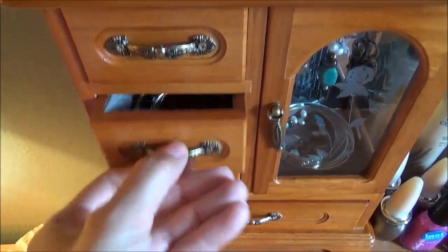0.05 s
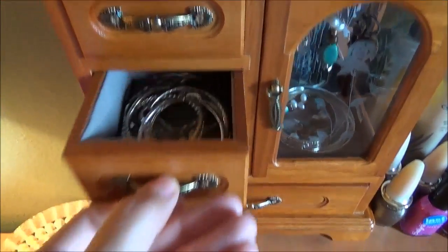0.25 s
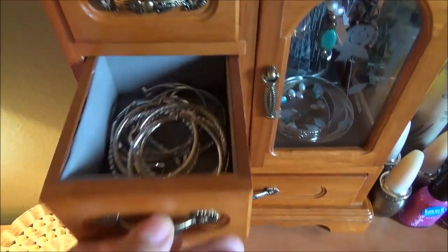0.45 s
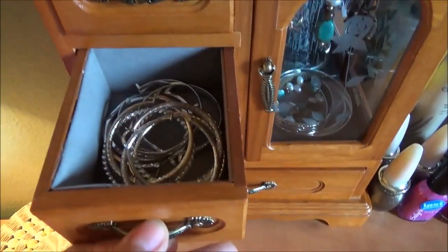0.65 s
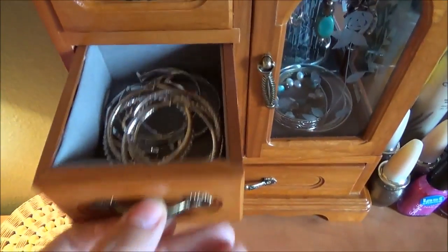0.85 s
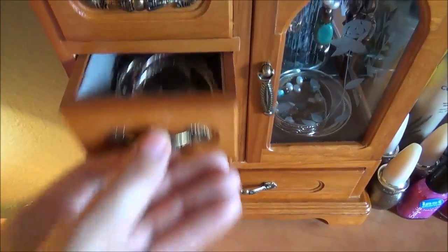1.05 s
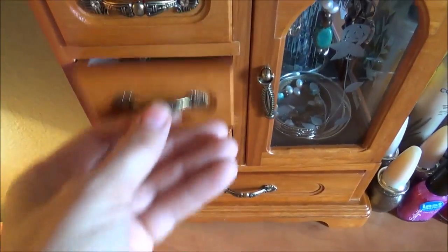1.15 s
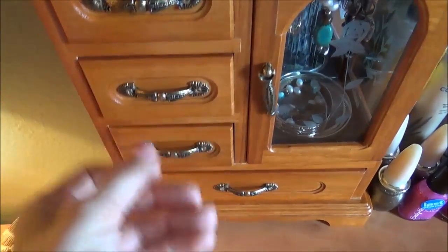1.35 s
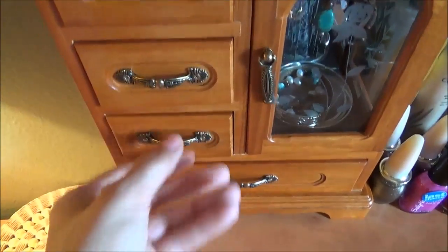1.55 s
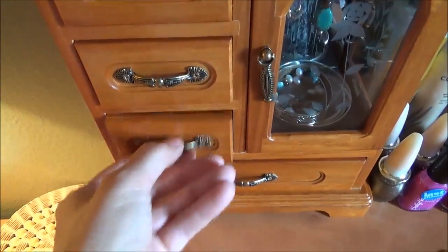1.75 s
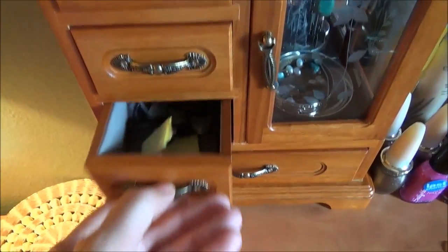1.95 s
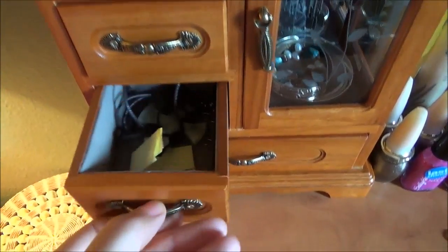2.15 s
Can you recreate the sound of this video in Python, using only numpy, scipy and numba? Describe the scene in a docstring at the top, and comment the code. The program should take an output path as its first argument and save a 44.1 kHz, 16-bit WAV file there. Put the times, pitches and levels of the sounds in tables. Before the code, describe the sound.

Close up in a quiet room, wood rubs on wood as a little cabinet drawer is pulled out, then shoved in harder with a burst of knocks; small metal ticks follow and the drawer below is drawn out jerkily.

```python
"""A quiet furnished room, two-port microphone close to a jewellery cabinet with small wooden drawers.
A hand pulls one drawer out, pushes it shut with a clatter, lifts the handle of the next and pulls that.
Wood sticks and slips on wood: dense tiny jolts ring the cabinet panels, the drawer and its air pocket.
Grain hisses under the slide, knocks crack, metal ticks; a room tail, air noise and faint hum lie behind."""
import sys
import numpy as np
from scipy import signal
from scipy.fft import rfft, irfft
from scipy.io import wavfile
from scipy.ndimage import uniform_filter1d
from numba import njit

SR = 44100
rng = np.random.default_rng(int(sys.argv[2]) if len(sys.argv) > 2 else 0)


def gain_from_decibels(decibels):
    """Convert decibel values to linear amplitude factors."""
    exponent = np.asarray(decibels, float) / 20
    return 10 ** exponent


def master_out(mix):
    """Clip the mix to full scale and print it as 16-bit PCM to the path in sys.argv[1]."""
    frames = np.transpose(np.atleast_2d(mix))
    ceiling = np.clip(frames, -1, 1)
    pcm = np.round(ceiling * 32767).astype(np.int16)
    wavfile.write(sys.argv[1], SR, pcm)


N = 96579
T = np.arange(N) / SR

# the three slides, each with its own rows: time_s, rub_on_frame_db, rub_on_drawer_db, hiss_db, pocket_hz
SLIDES = [
    [(0.0, -34.5, -32.5, -36.5, 770), (0.038, -29, -26.5, -40, 780), (0.086, -32.5, -22.5, -36, 797),
     (0.15, -28.5, -25, -41.5, 860), (0.158, -29.5, -24.5, -42, 917), (0.204, -30.5, -24, -31.5, 914),
     (0.232, -31, -29, -39, 980), (0.262, -31.5, -26.5, -37, 960), (0.326, -32, -30.5, -45.5, 840),
     (0.408, -36, -31, -47.5, 924), (0.452, -40.5, -38, -48, 920), (0.47, -35, -35, -52, 940),
     (0.492, -50, -54, -56, 950), (0.522, -65, -92, -83, 929), (0.54, -41, -71, -86, 930),
     (0.574, -80, -89, -82, 960)],
    [(0.666, -69, -89, -91, 880), (0.692, -48.5, -49, -90, 915), (0.758, -59, -50.5, -84, 895),
     (0.77, -42, -48, -68, 855), (0.796, -46, -47, -47.5, 850), (0.824, -36.5, -34.5, -47.5, 894),
     (0.886, -33.5, -31.5, -43.5, 960), (0.902, -29, -30.5, -47, 910), (0.914, -24, -34.5, -40, 895),
     (0.948, -42, -20, -38.5, 1020), (0.96, -23.5, -19, -30, 1060), (0.972, -24.5, -17.5, -28.5, 1010),
     (1.002, -19.5, -22.5, -29.5, 930), (1.03, -21.5, -20.5, -28, 1030), (1.055, -22, -25, -33, 860),
     (1.075, -28.5, -17, -35.5, 880), (1.12, -25.5, -22.5, -34.5, 880), (1.148, -39, -51, -33, 800),
     (1.16, -33, -36, -35.5, 770)],
    [(1.735, -34, -56, -55, 685), (1.745, -46, -57, -44.5, 667), (1.765, -34.5, -51, -46.5, 700),
     (1.789, -29.5, -27.5, -38.5, 687), (1.823, -30.5, -47, -38.5, 710), (1.865, -34, -50, -40.5, 760),
     (1.877, -25.5, -35.5, -36, 760), (1.913, -28.5, -28, -36, 750), (1.945, -31, -24.5, -41.5, 700),
     (1.961, -32, -25.5, -44.5, 700), (1.981, -28.5, -22, -43.5, 716), (2.027, -32, -31, -45, 740),
     (2.049, -23, -21.5, -40, 720), (2.063, -40, -27, -51, 730), (2.121, -39, -48, -53, 730),
     (2.163, -40.5, -46.5, -61, 830), (2.19, -33, -33, -73, 780)],
]
POCKET_WIDTH_HZ, POCKET_DB = (270, 297, 284), (9, 9, 6)  # one value per slide
# the whole cabinet rocking on a knock: pitch_hz, level_db, t60_s
CABINET_ROCK = [(65, -44, 0.17)]
# cabinet panels, rung by rubbing on the frame, catches and knocks: pitch_hz, level_db, t60_s
CABINET_PANELS = [(139, -24, 0.11), (183.6, -16.5, 0.068), (247, -8.5, 0.081), (318.5, -3, 0.064),
                  (414.8, -2.5, 0.083), (481, -6.5, 0.075), (566.3, -6, 0.061), (709.7, -8.5, 0.11),
                  (800, -3.5, 0.017), (1081, -6, 0.046), (1385, -3, 0.015), (2134, -14.5, 0.027),
                  (3300, -40, 0.012)]
# wood of the first drawer: pitch_hz, level_db, t60_s
UPPER_DRAWER = [(825, -1, 0.084), (871, 4.5, 0.033), (1005, -2.5, 0.02), (1091, -11.5, 0.058),
                (1320, -19, 0.023), (1337, -11, 0.02), (1642, -8.5, 0.053), (1778, -11.5, 0.046),
                (1924, -5, 0.022), (2435, -13, 0.063), (2685, -3, 0.022), (2820, -6.5, 0.036),
                (3170, -9.5, 0.027), (3570, -15, 0.046)]
# wood of the next drawer: pitch_hz, level_db, t60_s
LOWER_DRAWER = [(307.4, -7, 0.13), (711.7, 2, 0.099), (820, -3.5, 0.014), (1130, -6.5, 0.022),
                (1386, -7, 0.022), (1620, -16, 0.027), (2515, -9, 0.028), (2680, -10, 0.021)]
# hard catches while sliding: start_s, push_db, push_ms
CATCHES = [(0.031, -27, 0.27), (0.062, -18.5, 0.37), (0.088, -19, 0.22), (0.158, -12, 0.66),
           (0.184, -18, 0.27), (0.213, -21, 0.077), (0.226, -15.5, 0.23), (0.236, -15, 0.56),
           (0.254, -16.5, 0.23), (0.271, -18.5, 0.25), (0.281, -24.5, .4), (0.334, -18.5, 0.59),
           (0.463, -28, 0.43), (0.536, -34, 0.49), (0.552, -46, 0.43), (0.766, -34, 0.38),
           (0.802, -28, 0.44), (0.824, -22.5, 0.55), (0.844, -19, 0.62), (0.911, -13, 0.53),
           (0.955, -14, 0.29), (0.994, -8, 0.35), (1.005, -9.5, 0.43), (1.019, -3.5, 0.52),
           (1.028, -16.5, 0.13), (1.039, -13, 0.35), (1.056, -7, 0.4), (1.081, -13, 0.79),
           (1.102, -17, 0.3), (1.784, -18, 1), (1.874, -29, 0.15), (1.917, -15, 0.43), (1.935, -17.5, 0.32),
           (1.978, -10, 0.93), (2.0, -17, 1), (2.018, -14.5, 0.34), (2.033, -17.5, 0.63),
           (2.044, -15, 0.06)]
# knocks, drawer front on frame and handle on drawer: start_s, push_db, push_ms, crack_db
KNOCKS = [(1.1736, -2.5, 0.83, -26), (1.1766, -8, 0.78, -26), (1.187, -7.5, 0.4, -29),
          (1.1932, -8, 0.19, -19), (1.2, -6, 0.3, -28), (1.2119, -8, 0.058, -23.5),
          (1.2274, -12.5, 0.33, -39), (1.2403, -14.5, 0.39, -56), (1.2525, -23.5, 1.1, -58),
          (1.2674, -24.5, 0.47, -51), (1.608, -18.5, 1.75, -49), (1.6409, -26.5, 1.27, -49),
          (1.7147, -18, 0.87, -44), (1.7209, -21, 0.48, -54), (1.7295, -20, 1.13, -52)]
# stretches where the drawer binds and scrapes harder and brighter: start_s, length_s, level_db
BINDS = [(0.086, 0.034, -32.5), (0.766, 0.05, -39.5), (0.976, 0.085, -21.5), (1.859, 0.064, -32)]
# colour of the grain hiss: pitch_hz, relative level_db
GRAIN_COLOUR = [(1200, 4.5), (2000, 3.5), (3000, 0.5), (3800, -4), (5200, -4.5), (6500, -1), (8500, -6.5),
                (10800, 8), (11300, -17)]
# metal bangles and handles buzzing in the hiss: pitch_hz, width_hz, relative level_db
METAL_BUZZ = [(2793, 170, -10.5), (4210, 450, -13), (6040, 420, -8.5), (7380, 380, -7), (8210, 610, -8)]
# ticks of the metal handle: start_s, relative level_db
TICKS = [(1.263, -48), (1.275, -55), (1.564, -45.5), (1.583, -48), (1.607, -35), (1.638, -42), (1.704, -40),
         (2.04, -32.5)]
# metal handle modes: pitch_hz, level_db, t60_s
HANDLE_MODES = [(2620, -8, 0.011), (3310, 9.5, 0.0072), (5700, 2, 0.01), (6840, 0, 0.017), (7800, -4, .007),
                (8900, -10, .008), (10800, 0, 0.0055)]
# colour of the room air: pitch_hz, relative level_db
AIR_COLOUR = [(15, -35), (25, -18), (132, 0.5), (602, -1), (819, 2), (1270, -8.5), (1910, -11.5),
              (2660, -14.5), (3190, -15), (10600, -17.5), (11500, -23.5), (15000, -69), (22000, -120)]
# tone of the two microphone ports: pitch_hz, left_minus_right_db
PORT_TONE = [(25, -8), (80, -9), (170, -6.5), (330, -4.8), (500, -2), (720, 1.2), (1300, 2.6), (2800, .6),
             (5600, .5), (10000, 1)]

JOLTS_PER_S, JOLT_SPREAD_DB, JOLT_CAP_DB = 1400, 3, 9
JOLT_PUSH_S, CHATTER_DB = 0.00019, 1
STICK_S, STICK_DEPTH = 0.0043, 0.54  # depth is the share of rubbing lost
JUDDER_S, JUDDER_DB = 0.0046, 1.5  # level against the catch
CATCH_ON_FRAME_DB, KNOCK_ON_DRAWER_DB = -7, -3.5
RUN_ON_S, RADIATES_ABOVE_HZ = 0.012, 105
SETTLE_AT_S, SETTLE_DB, SETTLE_S = 1.145, -42, 0.17  # loose bangles settle as the drawer shuts
GRIP_S, HISS_FOLLOWS_JOLTS = 0.0032, 0.25
BIND_ABOVE_HZ, BIND_BELOW_HZ = 1125, 1610
HISS_FLICKER_DB, BUZZ_FLICKER_DB = 3.2, 4.5
CRACK_S, CRACK_RISE_S, CRACK_DARK_HZ = 0.0035, 0.0011, 4400
TICK_SCATTER_DB, TICK_RATTLE_S = 2, 0.0014
UNSHARED_HISS_DB = -11
ROOM_T60_S, ROOM_DB, ROOM_DARK_HZ, ROOM_GAP_S, ROOM_SPREAD = 0.3, -16, 3260, 0.0032, 0.5
AIR_DB, AIR_ALIKE = -51.5, 0.89  # alike: correlation of the two ports
HUM_HZ, HUM_DB, HUM_WAVER_DB = 120, -61, 3
PEAK_ROUND, PORT_RUMBLE_DB, PORT_RUMBLE_HZ, TOP_HZ = 0.75, -69, 110, 11150


def slides():
    """Stick-slip jolts, catches and knocks drive the wood; returns its sound and the hiss envelope."""
    frame_jolts, drawer_jolts = jolt_train(), jolt_train()
    catches = pushes(CATCHES)
    knocks = pushes([row[:3] for row in KNOCKS])
    hits_frame = gain_from_decibels(CATCH_ON_FRAME_DB) * catches + knocks
    hits_drawer = catches + gain_from_decibels(KNOCK_ON_DRAWER_DB) * knocks
    rubbing_left, judder = stick_and_judder()
    drawers = UPPER_DRAWER, UPPER_DRAWER, LOWER_DRAWER
    spans = T < 0.62, (T >= 0.62) & (T < 1.5), T >= 1.5  # which slide takes the hits
    body, silence = 0, np.zeros(N)
    hiss = gain_from_decibels(SETTLE_DB) * burst(SETTLE_AT_S, 0.0032, SETTLE_S)
    for rows, drawer, width_hz, pocket_db, span in zip(SLIDES, drawers, POCKET_WIDTH_HZ, POCKET_DB, spans):
        time_s, frame_db, drawer_db, hiss_db, pocket_hz = np.array(rows, float).T
        pocket_hz = np.interp(T, time_s, pocket_hz)
        moving = (T >= time_s[0]) * (T <= time_s[-1] + RUN_ON_S)
        frame_env, drawer_env, hiss_env = (
            moving * gain_from_decibels(np.interp(T, time_s, db)) for db in (frame_db, drawer_db, hiss_db))
        box = drawer, pocket_hz, width_hz, pocket_db
        # the judder locks to the air pocket
        shake = judder * np.sin(2 * np.pi * np.cumsum(pocket_hz) / SR)
        # each rub is scaled by how loudly the wood answers it
        rub_frame = rubbing_left * frame_jolts * frame_env / np.std(wood(frame_jolts, silence, *box))
        rub_drawer = rubbing_left * drawer_jolts * drawer_env / np.std(wood(silence, drawer_jolts, *box))
        on_frame = rub_frame + span * hits_frame
        on_drawer = rub_drawer + span * (hits_drawer + shake)
        body = body + wood(on_frame, on_drawer, *box)
        hiss = hiss + hiss_env
    high_pass = signal.butter(4, RADIATES_ABOVE_HZ, "high", fs=SR, output="sos")
    body = signal.sosfilt(high_pass, body) + ring(knocks, CABINET_ROCK)
    grip = unit(uniform_filter1d(np.abs(drawer_jolts), int(GRIP_S * SR)))
    return body, hiss * (1 - HISS_FOLLOWS_JOLTS + HISS_FOLLOWS_JOLTS * grip)


def wood(on_frame, on_drawer, drawer, pocket_hz, width_hz, pocket_db):
    """Cabinet panels answer the force on the frame; drawer and air pocket answer that on the drawer."""
    pocket = on_drawer * gain_from_decibels(pocket_db) * SR / (np.pi * width_hz)
    for _ in range(2):
        pocket = moving_band(pocket, pocket_hz, float(width_hz))
    return (ring(on_frame, CABINET_PANELS) + ring(on_drawer, drawer) + pocket) / 2


def jolt_train():
    """Dense slips of random size; the grip gives way before it grows too strong."""
    size_db = np.minimum(JOLT_SPREAD_DB * rng.exponential(size=N), JOLT_CAP_DB)
    size = gain_from_decibels(size_db + CHATTER_DB * walk(70))
    slips = rng.random(N) < JOLTS_PER_S / SR
    hits = slips * size * rng.choice([-1, 1], N)
    return signal.lfilter([1], [1, -np.exp(-1 / (JOLT_PUSH_S * SR))], hits)


def stick_and_judder():
    """The runner sticks just before a catch and judders after it: share of rubbing left, judder envelope."""
    left, judder = 1, 0
    for start_s, push_db, _ in CATCHES:
        left = left * (1 - STICK_DEPTH * np.exp(-((T - start_s + STICK_S / 2) / STICK_S) ** 2))
        shape = np.sin(np.pi * np.clip((T - start_s) / JUDDER_S, 0, 1))
        judder = judder + gain_from_decibels(push_db + JUDDER_DB) * shape / shape.sum()
    return left, judder


def pushes(rows):
    """Half-sine force pulses whose area is set by the push level."""
    force = np.zeros(N)
    for start_s, push_db, push_ms in rows:
        shape = np.sin(np.pi * np.clip((T - start_s) / (push_ms / 1000), 0, 1))
        force += gain_from_decibels(push_db) * shape / (shape.sum() + 1e-9)
    return force


def binding():
    """Hard band-limited jolts that ring the drawer's modes while it binds."""
    env = 0
    for start_s, length_s, level_db in BINDS:
        env = env + gain_from_decibels(level_db) * np.sin(np.pi * np.clip((T - start_s) / length_s, 0, 1)) ** 0.5
    band = signal.butter(2, [BIND_ABOVE_HZ, BIND_BELOW_HZ], "band", fs=SR, output="sos")
    hard = signal.sosfilt(band, jolt_train())
    out = 0
    for drawer, span in ((UPPER_DRAWER, T < 1.5), (LOWER_DRAWER, T >= 1.5)):
        out = out + ring(hard * env * span, drawer) / np.std(ring(hard, drawer))
    return out


def grain():
    """Broad hiss of wood grain whose bands flicker, with flickering metal buzz."""
    hiss = 0
    for hz in 1300 * 2 ** np.arange(0, 3.2, 0.4):
        band = moving_band(rng.standard_normal(N), np.full(N, hz), hz / 3)
        hiss = hiss + band * gain_from_decibels(HISS_FLICKER_DB * walk(30.95))
    hiss = unit(colour(hiss, GRAIN_COLOUR))
    buzz = 0
    for hz, width_hz, level_db in METAL_BUZZ:
        flicker = gain_from_decibels(level_db + BUZZ_FLICKER_DB * walk(25.59))
        band = moving_band(rng.standard_normal(N), np.full(N, float(hz)), float(width_hz))
        buzz = buzz + flicker * unit(band)
    return unit(hiss + buzz * gain_from_decibels(-6.5))


def cracks():
    """The short splintery crack on each knock: a burst of darkened grain."""
    env = sum(gain_from_decibels(crack_db) * burst(start_s, CRACK_RISE_S, CRACK_S) for start_s, _, _, crack_db in KNOCKS)
    dark_grain = signal.lfilter([1], [1, -np.exp(-2 * np.pi * CRACK_DARK_HZ / SR)], grain())
    return 2 * env * unit(dark_grain)


def handle():
    """Each tick is a brief rattle that rings the metal handle's modes in its own mix."""
    scatter = rng.standard_normal((len(TICKS), len(HANDLE_MODES)))
    rattle = rng.standard_normal(N)
    out = 0
    for (start_s, level_db), offsets in zip(TICKS, scatter):
        force = gain_from_decibels(level_db - 18.5) * rattle * burst(start_s, TICK_RATTLE_S / 4, TICK_RATTLE_S)
        modes = [(hz, db + TICK_SCATTER_DB * offset, t60_s)
                 for (hz, db, t60_s), offset in zip(HANDLE_MODES, offsets)]
        out = out + ring(force, modes)
    return out


def room(near):
    """A diffuse, decaying noise tail after a short gap, different at each port."""
    t = T[:int(0.5 * SR)]
    tail = rng.standard_normal((2, len(t))) * gain_from_decibels(-60 * t / ROOM_T60_S) * (t > ROOM_GAP_S)
    mid, side = signal.lfilter([1], [1, -np.exp(-2 * np.pi * ROOM_DARK_HZ / SR)], tail)
    ports = mid + ROOM_SPREAD * side * np.array([[1], [-1]])
    return gain_from_decibels(ROOM_DB) * signal.fftconvolve(near[None], ports / np.sqrt(np.sum(mid ** 2)), axes=1)[:, :N]


def air():
    """Quiet room noise, partly shared by the ports, with a faint wavering mains hum."""
    mid, side = (unit(colour(rng.standard_normal(N), AIR_COLOUR)) for _ in range(2))
    shared = np.sqrt((1 + AIR_ALIKE) / 2) * mid
    unshared = np.sqrt((1 - AIR_ALIKE) / 2) * side * np.array([[1], [-1]])
    hum = gain_from_decibels(HUM_DB + HUM_WAVER_DB * walk(8.9)) * np.sin(2 * np.pi * HUM_HZ * T)
    return gain_from_decibels(AIR_DB) * (shared + unshared) + hum


def unit(x):
    """Scale to rms 1."""
    return x / np.sqrt(np.mean(x ** 2))


def colour(x, points, share=1):
    """Shape a spectrum by (Hz, dB) points joined over log frequency; share scales the dB."""
    hz, db = np.array(points, float).T
    f = np.maximum(np.arange(N // 2 + 1) * SR / N, 1)
    gain = gain_from_decibels(share * np.interp(np.log(f), np.log(hz), db))
    return irfft(rfft(x) * gain, N)


def ring(force, modes):
    """A bank of decaying two-pole resonances, alternating in sign."""
    out = 0
    for k, (hz, db, t60_s) in enumerate(modes):
        r = np.exp(-np.log(1000) / (t60_s * SR))
        w = 2 * np.pi * hz / SR
        mode = signal.lfilter([0, r * np.sin(w)], [1, -2 * r * np.cos(w), r * r], force)
        out = out + (-1) ** k * gain_from_decibels(db) * mode
    return out


@njit
def moving_band(x, hz, width):
    """State-variable band-pass with a moving centre."""
    y, band, low = np.empty(len(x)), 0., 0.
    for i in range(len(x)):
        g, k = np.tan(np.pi * hz[i] / SR), width / hz[i]
        v = (band + g * (x[i] - low)) / (1 + g * (g + k))
        band, low, y[i] = 2 * v - band, low + 2 * g * v, k * v
    return y


def walk(rate):
    """Random levels of rms 1, held 1 / rate s and slewed."""
    k = int(SR / rate)
    held = np.repeat(rng.standard_normal(N // k + 1), k)
    return unit(uniform_filter1d(held, k)[:N])


def burst(start_s, rise_s, fall_s):
    """Envelope that rises and dies away after its start."""
    u = np.maximum(T - start_s, 0)
    return (1 - np.exp(-u / rise_s)) * np.exp(-u / fall_s)


def scene():
    """Near sounds, hiss that differs between the ports, the room tail and the room air."""
    body, hiss = slides()
    near = body + hiss * grain() + binding() + cracks() + handle()
    unshared = gain_from_decibels(UNSHARED_HISS_DB) * hiss * grain() * np.array([[1], [-1]])
    return near + unshared + room(near) + air()


def band_limit(x):
    """A steep low-pass at the top of the band."""
    return signal.sosfilt(signal.butter(12, 12180, fs=SR, output="sos"), x)


def record(dry):
    """The microphone rounds peaks; its ports differ in tone, each with faint rumble; the top is cut."""
    low_pass = signal.butter(2, PORT_RUMBLE_HZ, fs=SR, output="sos")
    rumble = unit(signal.sosfilt(low_pass, rng.standard_normal((2, N))))
    rounded = PEAK_ROUND * np.tanh(dry / PEAK_ROUND)
    left, right = rounded + gain_from_decibels(PORT_RUMBLE_DB) * rumble
    ports = np.array([colour(left, PORT_TONE, 0.5), colour(right, PORT_TONE, -0.5)])
    top_cut = signal.ellip(10, 0.3, 70, TOP_HZ, fs=SR, output="sos")
    return band_limit(signal.sosfilt(top_cut, ports))


dry = scene()
out = record(dry)
master_out(out)
```